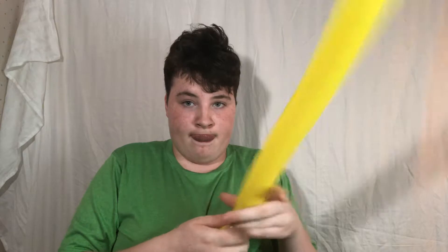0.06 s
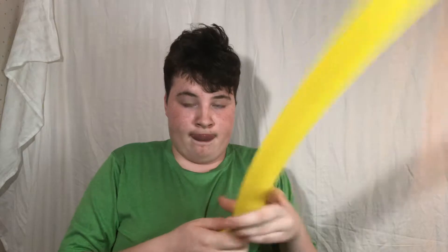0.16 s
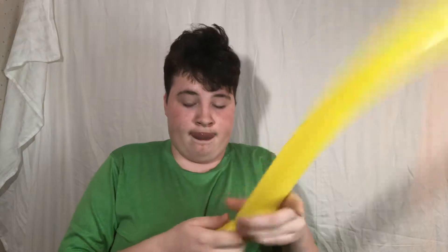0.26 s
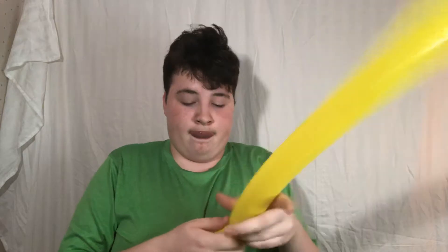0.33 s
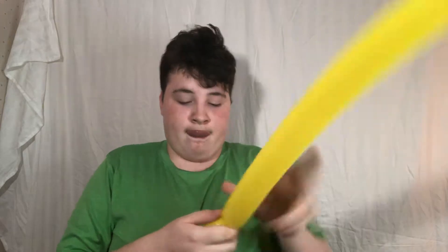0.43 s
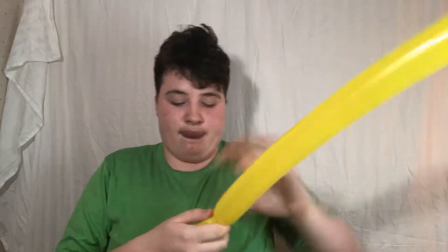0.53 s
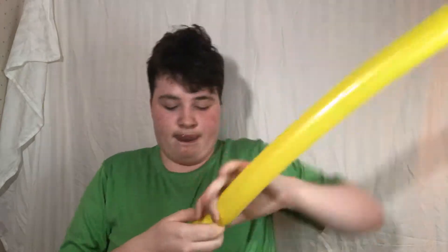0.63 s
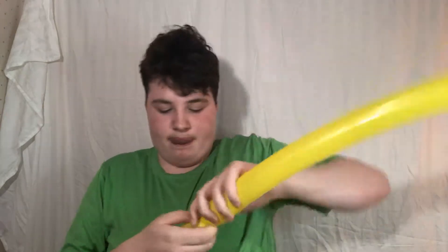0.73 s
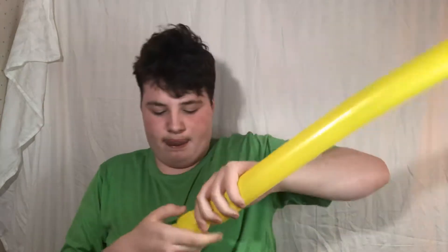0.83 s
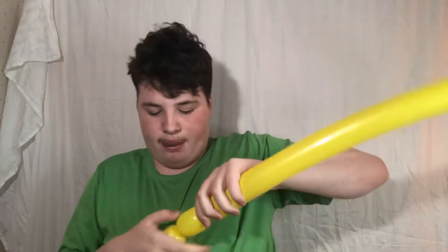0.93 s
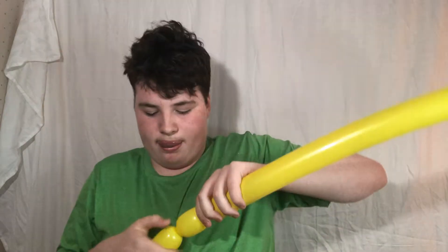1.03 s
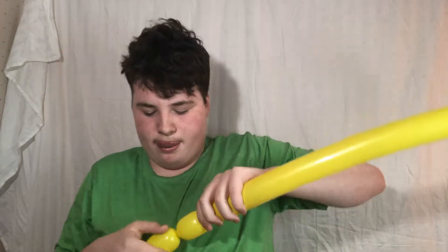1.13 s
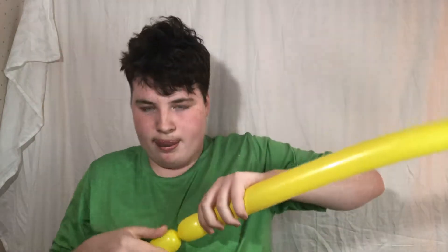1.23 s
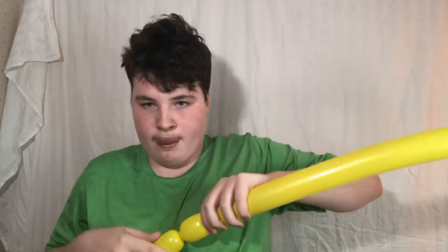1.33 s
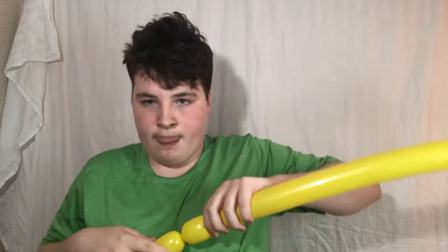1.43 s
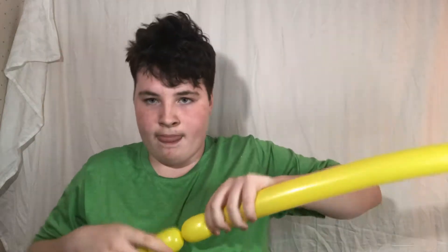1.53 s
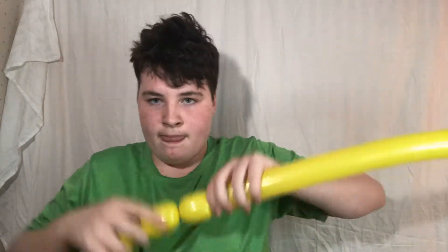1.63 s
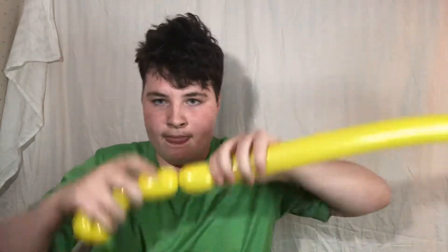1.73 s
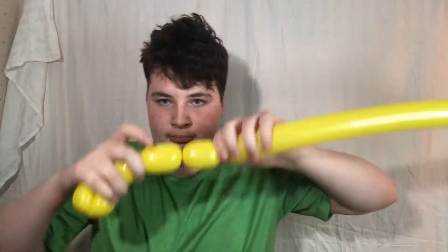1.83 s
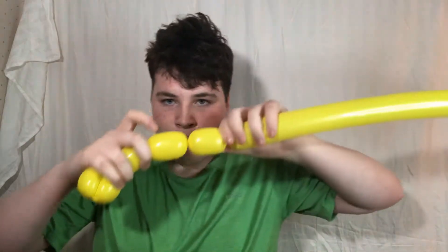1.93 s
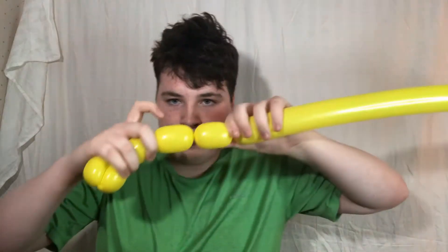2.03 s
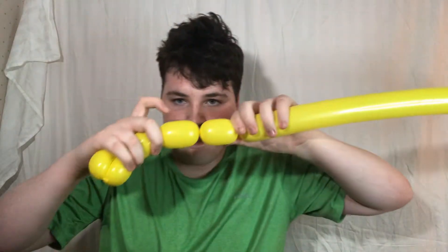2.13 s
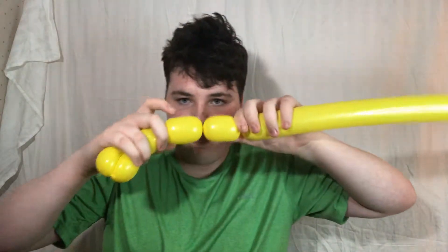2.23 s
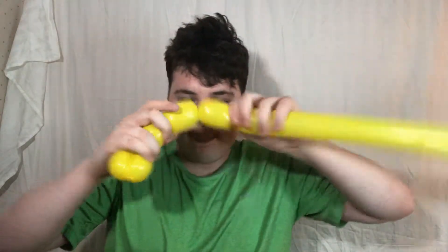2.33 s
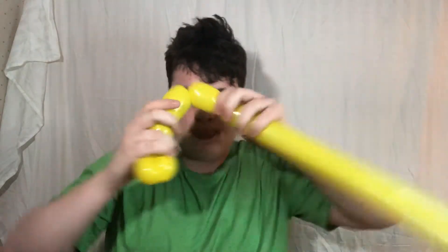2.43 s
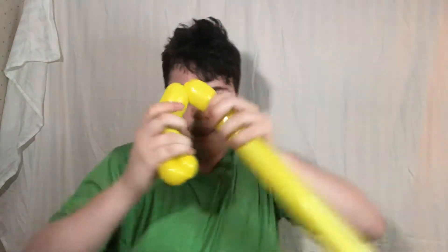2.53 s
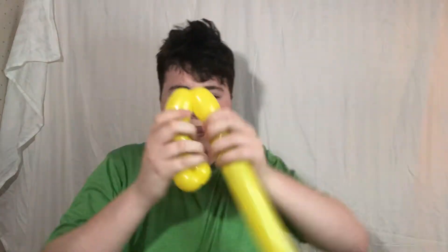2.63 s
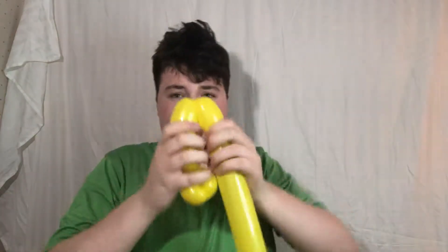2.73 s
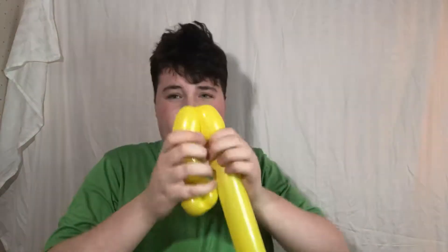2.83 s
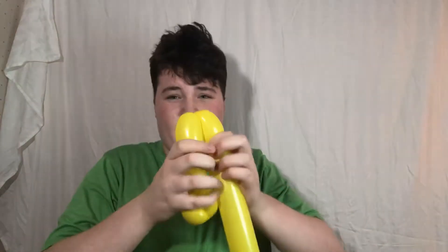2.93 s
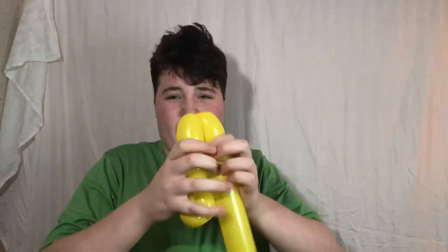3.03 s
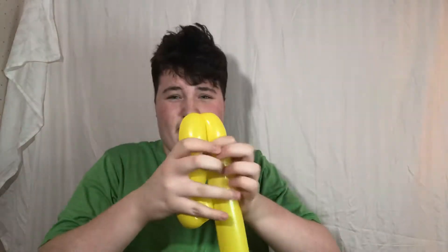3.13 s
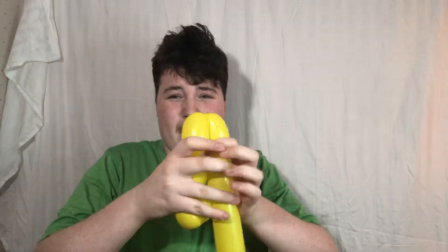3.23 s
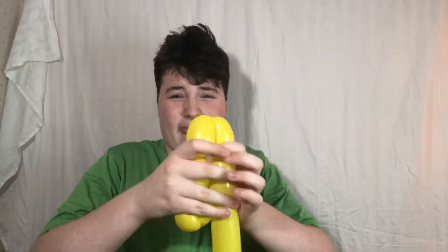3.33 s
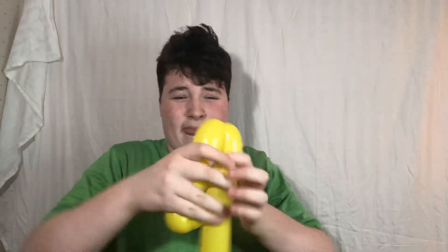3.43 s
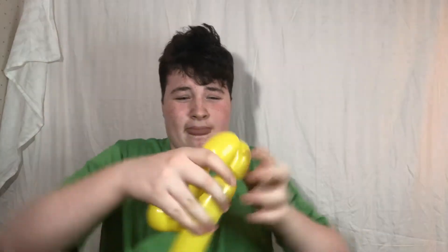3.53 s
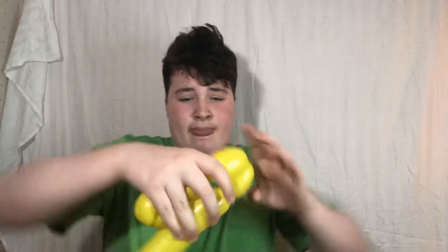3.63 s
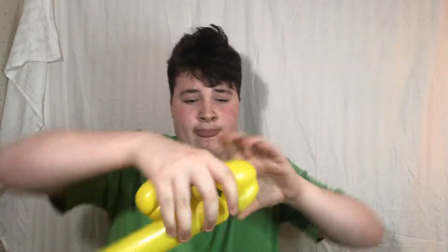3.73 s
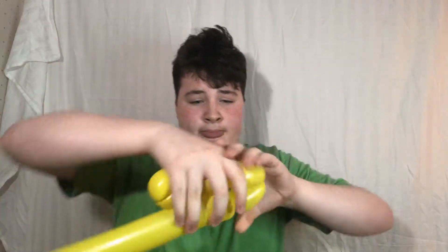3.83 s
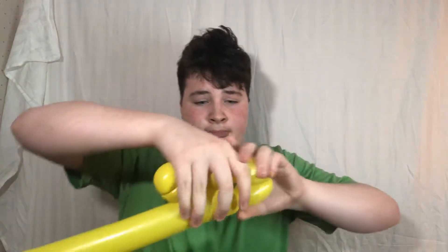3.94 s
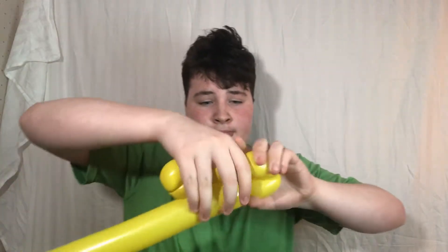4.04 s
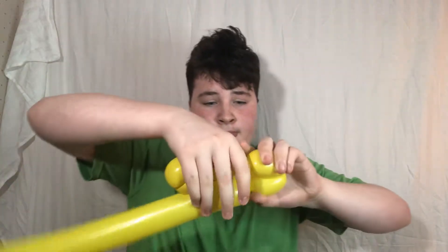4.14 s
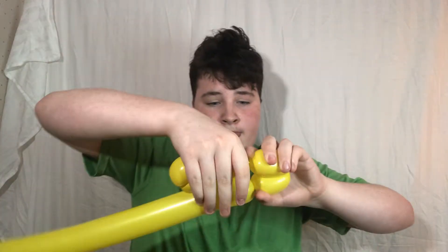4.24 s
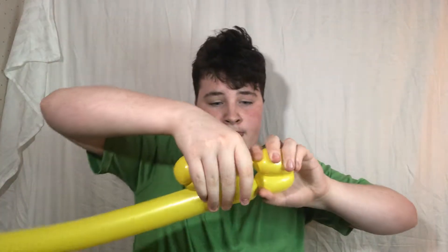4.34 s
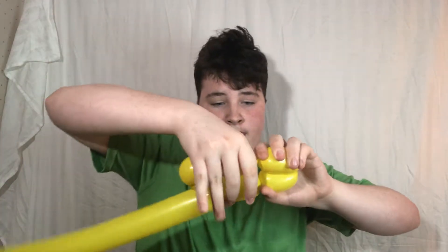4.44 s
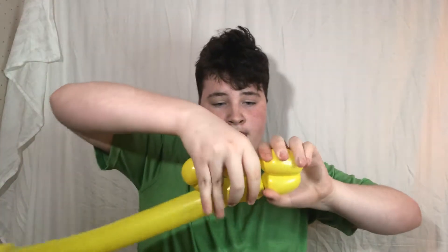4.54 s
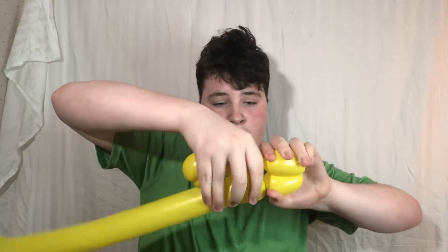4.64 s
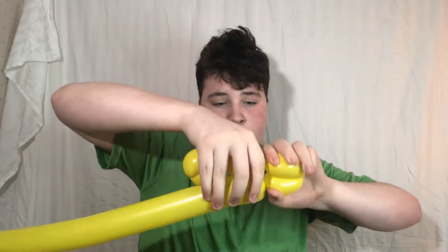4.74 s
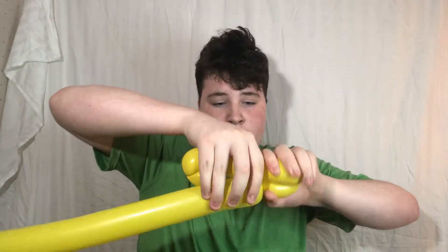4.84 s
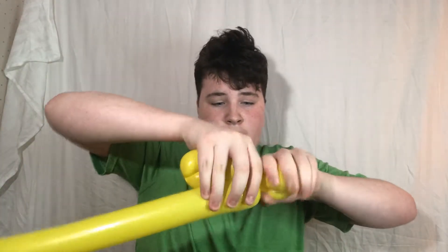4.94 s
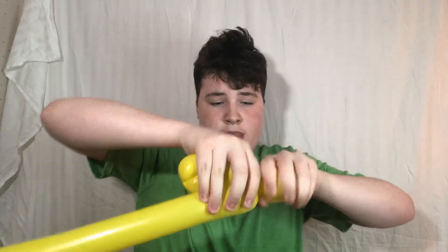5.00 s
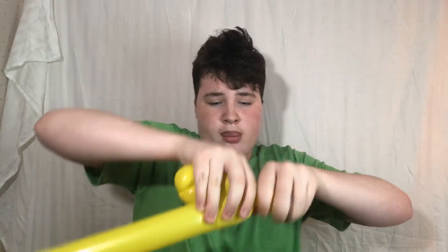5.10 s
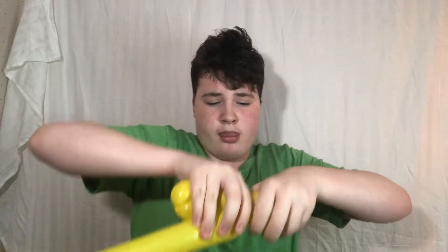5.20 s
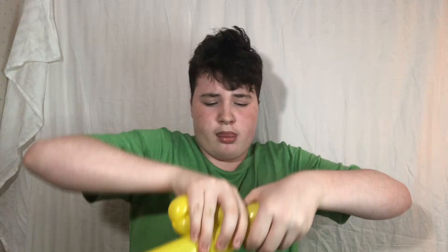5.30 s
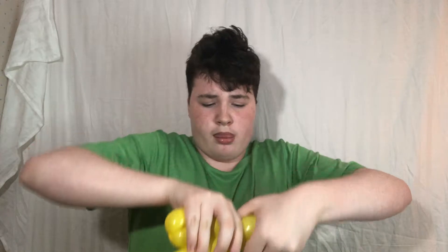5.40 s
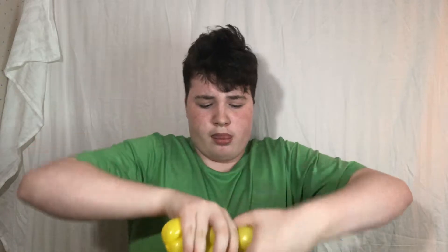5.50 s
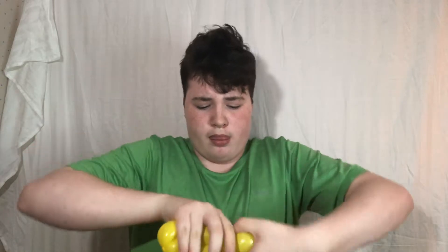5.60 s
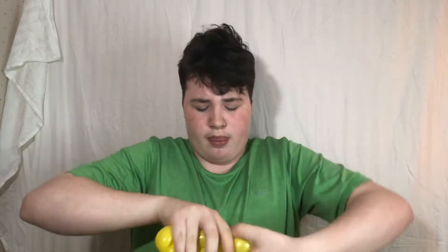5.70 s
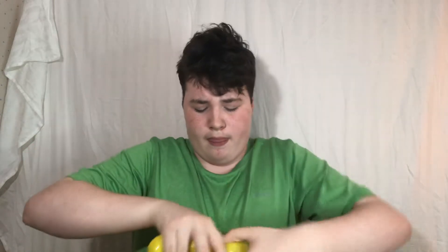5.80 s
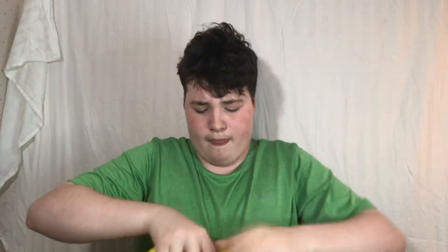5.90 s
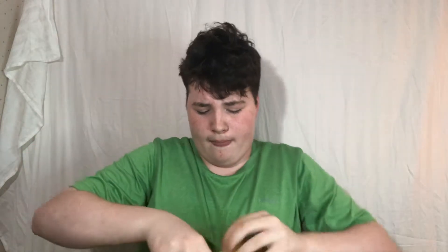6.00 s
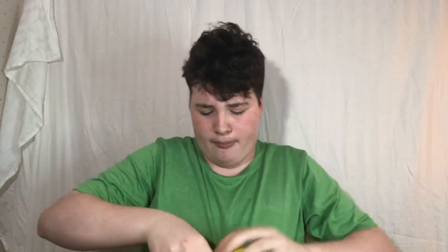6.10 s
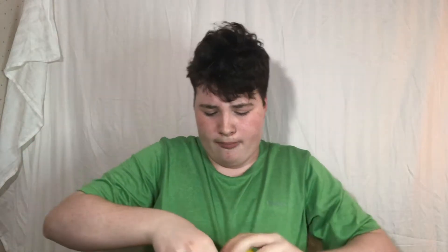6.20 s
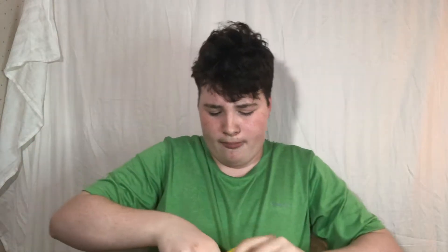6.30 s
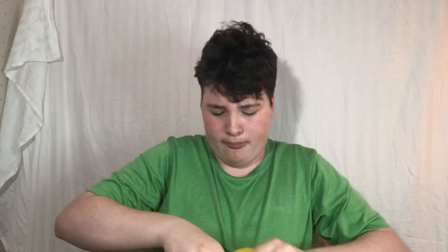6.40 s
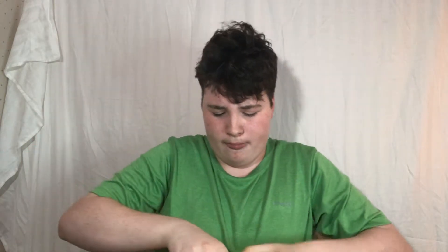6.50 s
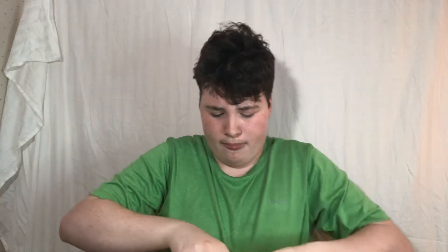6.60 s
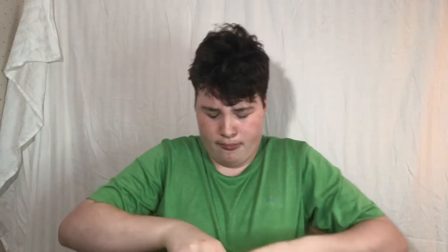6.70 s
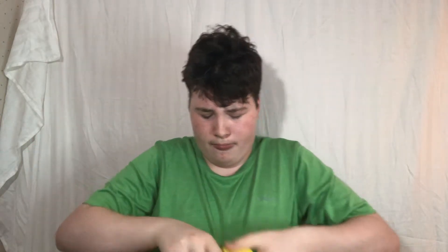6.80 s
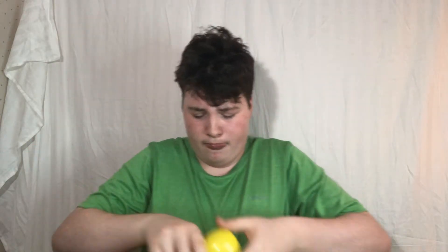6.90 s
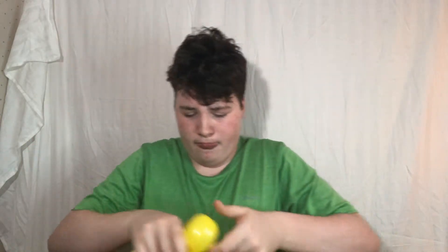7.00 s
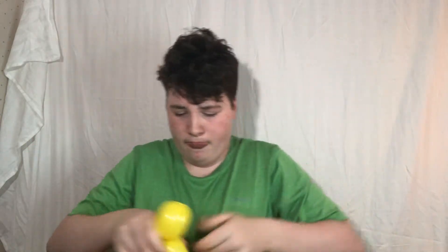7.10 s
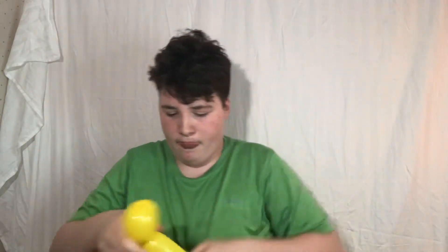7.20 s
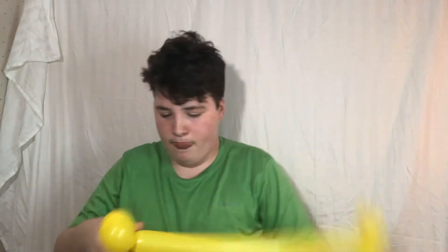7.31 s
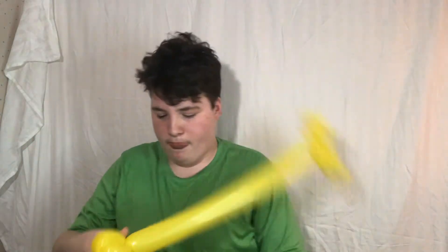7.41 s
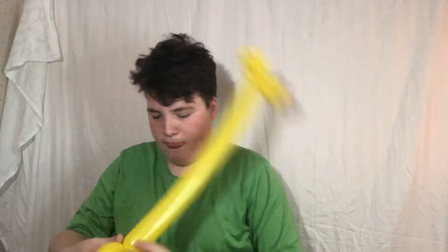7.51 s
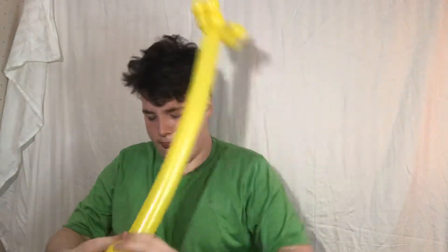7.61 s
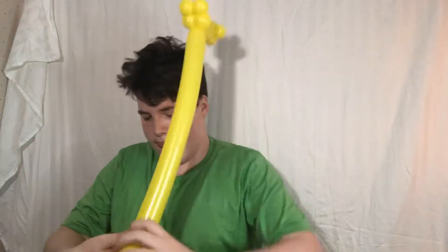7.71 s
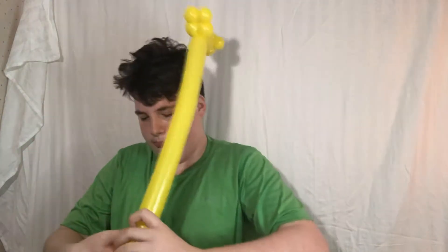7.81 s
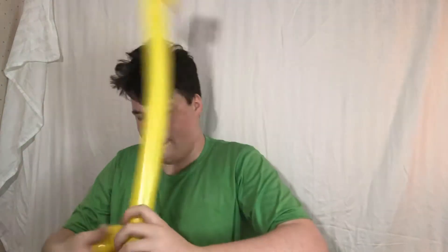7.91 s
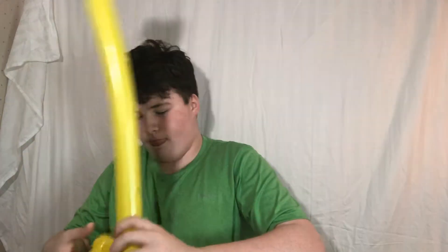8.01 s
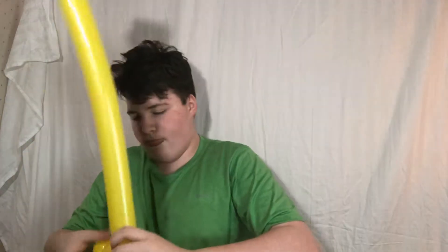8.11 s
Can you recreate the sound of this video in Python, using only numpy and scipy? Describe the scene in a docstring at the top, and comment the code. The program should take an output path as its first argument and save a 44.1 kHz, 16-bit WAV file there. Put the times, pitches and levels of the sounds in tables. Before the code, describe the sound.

Hands twist and rub a long latex balloon up close in a small room, giving squeaks, creaks, rasps and sharp snaps between quiet gaps.

```python
"""Long balloon twisted by hand.

Hands twist and brush a long latex balloon, stroke by stroke, in a small room. The rubber sticks and slips:
single slips snap, slow trains creak, fast uneven ones rasp and fast even ones squeak.
Every slip is a pulse run through the taut skin as a tiny falling chirp, repeated between two twists.
Jolts thud softly in low noise; the room adds a short tail of decaying noise and a faint steady rush."""
import sys
import numpy as np
from scipy import signal
from scipy.fft import rfft, irfft, next_fast_len
from scipy.io import wavfile
from scipy.ndimage import uniform_filter1d, map_coordinates

SR = 44100
rng = np.random.default_rng(int(sys.argv[2]) if len(sys.argv) > 2 else 0)


def pcm_store(signal):
    """Save signal as 16-bit PCM."""
    levels = np.round(np.clip(np.atleast_2d(signal), -1, 1) * 32767)
    wavfile.write(sys.argv[1], SR, levels.astype(np.int16).T)


N = 359415


def amp(db):
    """Decibels to gain."""
    return 10 ** (np.asarray(db) / 20)


def unit(x):
    """Scale to rms 1."""
    return x / np.sqrt(np.mean(x ** 2) + 1e-20)


def along(points, hz):
    """Interpolate (Hz, value) points on a log frequency axis."""
    point_hz, value = np.transpose(points)
    return np.interp(np.log(hz + 1), np.log(point_hz), value)


def at(rows, t):
    """Interpolate each column of a (seconds, values..) curve at the times t."""
    row_s, *columns = np.transpose(rows)
    return [np.interp(t, row_s, column) for column in columns]


def wobble(t, knots_per_s):
    """Smooth random curve at the times t."""
    knots = rng.standard_normal(int(N * knots_per_s / SR) + 4)
    return map_coordinates(knots, [t * knots_per_s], mode="nearest")


def filtered(x, response):
    """Multiply the spectrum of x by a function of frequency."""
    m = next_fast_len(N + SR // 2)
    return irfft(rfft(x, m) * response(np.fft.rfftfreq(m, 1 / SR)), m)[:N]


def causal(gain):
    """Minimum-phase response with this gain, by folding the cepstrum."""
    cepstrum = irfft(np.log(np.maximum(gain, 1e-6)))
    half = len(cepstrum) // 2
    folded = np.r_[cepstrum[0], 2 * cepstrum[1:half], np.zeros(half)]
    return np.exp(rfft(folded))


def pulses(times, sizes, half_width=8):
    """Band-limited impulses (windowed sincs) that may fall between samples."""
    index = np.floor(times * SR).astype(int)[:, None] + np.arange(1 - half_width, half_width + 1)
    lag = index - times[:, None] * SR
    shape = np.sinc(lag) * np.cos(np.pi * lag / (2 * half_width)) ** 2
    return np.bincount(np.clip(index, 0, N).ravel(), (sizes[:, None] * shape).ravel(), N + 1)[:N]


def stick_slip(t, rate_hz, rough, scatter_db):
    """Slip times and sizes (dB): roughness randomises how long each stick lasts and how large its slip is."""
    cycles = np.cumsum(rate_hz) / SR
    chance = rng.standard_normal((int(cycles[-1]) + 1, 2))
    order = np.arange(len(chance))
    spread = np.clip(np.interp(order, cycles, rough), 0, 1)
    drift = np.cumsum(spread * chance[:, 0])
    # the hand's travel keeps the slips from running ahead for long
    count = order + drift - uniform_filter1d(drift, size=15, mode="nearest")
    times = np.interp(count, cycles, t)
    # slower trains make larger slips
    spacing_db = 10 * np.log10(SR / np.interp(times, t, rate_hz))
    return times, spacing_db + scatter_db * spread * (chance[:, 1] - spread)


# Radiation of the skin. Each row: frequency in Hz, level in dB per Hz.
SKIN_HZ_DB = [(100, -66), (220, -18), (330, 0.5), (470, 5), (750, 2.5), (1000, 0), (1600, 1), (2500, -1),
              (3500, -1), (5000, -3), (7800, -6.5), (10000, -12.5), (13000, -14.5), (16000, -22.5)]
# Air pockets and taut patches. Each row: centre in Hz, width in Hz, boost in dB.
POCKETS_HZ_HZ_DB = [(1500, 23, 2.5), (3220, 170, 2.5), (5150, 220, 1)]
# Resonance of the pinched stretch of rubber. Each row: time in seconds, centre in Hz, lift in dB.
PINCH_S_HZ_DB = [(.05, 2105, 7.5), (.9, 798, -0.5), (1.07, 2320, 2.5), (1.3, 808, -1), (1.38, 764, 9),
                 (2.9, 2486, 0), (4.08, 910, 4), (4.33, 1061, 7.5), (4.8, 950, 7), (5.2, 1470, -1),
                 (5.65, 647, 5.5), (6.4, 880, 5), (6.88, 754, 2.5), (7.9, 640, 3.5)]


def balloon(times, db, bass_db, treble_db, echo, lap_s, sweep_s, top_db, patchy_db,
            top_follow=0.41, bands=14, laps=4):
    """Slips chirp through the skin; each wave shuttles between two twists, keeping the share echo per lap."""
    hz = np.fft.rfftfreq(4096, 1 / SR)
    pockets_db = sum(g / (1 + (2 * (hz - f) / w) ** 2) for f, w, g in POCKETS_HZ_HZ_DB)
    colour = amp(along(SKIN_HZ_DB, hz) + pockets_db)
    # low ripples travel more slowly: 1 kHz is late by sweep_s
    response = causal(colour) * np.exp(-4j * np.pi * sweep_s * np.sqrt(1000 * hz))

    def power_db(low_hz, high_hz):
        """Skin power over one range, to be taken off its tone setting."""
        return 10 * np.log10(np.mean(colour ** 2 * (hz > low_hz) * (hz < high_hz)))

    bass = bass_db - power_db(0, 850)
    middle = np.full_like(db, -power_db(850, 3000))
    treble = treble_db - power_db(3000, SR)
    tones = np.array([bass, middle, middle, treble, treble + top_follow * treble_db + top_db])
    anchors = np.log2([600, 1000, 2400, 4000, 12000])
    octaves = np.linspace(np.log2(300), np.log2(13000), bands)
    pinch_hz, lift_db = at(PINCH_S_HZ_DB, times)
    trips = np.arange(laps)[:, None]
    returns = np.clip(echo, 0, 1) ** trips
    out = np.zeros(N)
    for octave, pick in zip(octaves, np.eye(bands)):
        weights = np.array([np.interp(octave, anchors, e) for e in np.eye(len(anchors))])
        tone_db = weights @ tones
        pinch_db = lift_db * (np.exp(-((octave - np.log2(pinch_hz)) / .38) ** 2) - .35)
        # the contact point wanders, favouring now one part of the range, now another
        patch_db = patchy_db * wobble(times, 35)
        size = amp(db + tone_db + pinch_db + patch_db) / np.linalg.norm(returns)
        drive = pulses((times + trips * lap_s).ravel(), (size * returns).ravel(), half_width=4)
        band = np.interp(np.log2(hz + 1), octaves, pick)
        # 128 samples of lead keep what rings before the pulse
        ring = np.roll(irfft(response * band), 128)[:1500]
        out += signal.oaconvolve(drive, ring)[128:N + 128]
    return out


# Steady room noise. Each row: frequency in Hz, level in dB per Hz before scaling to rms 1.
RUSH_HZ_DB = [(22, -48), (45, -19), (105, -17.5), (195, -6), (335, -11.5), (600, -16), (2100, -26),
              (5400, -59), (14400, -57)]


def rush(level_db=-53):
    """The room's own faint, dull noise: white noise through a fixed curve."""
    noise = filtered(rng.standard_normal(N), lambda hz: amp(along(RUSH_HZ_DB, hz)))
    return amp(level_db) * unit(noise)


# Fingers shift their hold in a light, rough brush. Each row: start in seconds, length in seconds,
# crest level in dB.
BRUSHES_S_S_DB = [(0.001, .15, -38), (0.214, .09, -40.5), (0.331, .14, -47), (0.461, .21, -47),
                  (0.662, .05, -31.5), (0.94, .09, -58), (1.39, .2, -49), (1.682, .03, -43),
                  (1.72, .08, -58.5), (1.869, .14, -51.5), (2.071, .05, -51), (2.334, .08, -49.5),
                  (2.419, .11, -46), (2.549, .17, -41.5), (2.721, .16, -42), (3.385, .16, -47),
                  (3.722, .12, -57), (3.854, .09, -43.5), (4.191, .09, -52), (4.419, .16, -50),
                  (5.918, .03, -42.5), (6.039, .08, -50), (6.951, .14, -48), (7.302, .2, -49.5),
                  (7.499, 0.26, -47.5), (7.785, .08, -45), (8.082, .068, -50.5)]
# Shared by all brushes: share of the length spent rising; bass dB, treble dB, slips a second, roughness 0-1.
BRUSH_RISE, BRUSH_TONE = 0.3, (-2.5, 0, 150, 0.6249)
# A hand twists the rubber, pressing up to a crest and easing off. Each row: start in seconds, rise in seconds,
# fall in seconds, then at the crest level in dB, bass in dB, treble in dB, slips a second, roughness 0-1.
TWISTS = [(0.704, .03, .1, -26.5, -11, -2, 900, .15), (0.875, .02, .07, -34, -4.5, -3, 190, .5),
          (0.949, .04, .06, -51, 10, 7.5, 110, .2), (1.048, .012, .08, -30, -3, -6.5, 126, .2),
          (1.1, .04, .11, -38.5, 6, -2.5, 125, .2), (1.23, .06, .03, -26.5, 1.5, -1, 200, .07),
          (1.295, .033, .027, -19, -9, -0.5, 400, .12), (1.33, .027, .028, -20.5, -1.5, 0, 740, .08),
          (2.99, .05, .2, -36, -9, 1, 700, .4), (3.17, .1, .08, -42.5, -8, 4, 750, .45),
          (3.34, .07, .1, -46.5, 9.5, -8, 200, .5), (3.925, .058, .05, -34.5, -8.5, -1, 300, .43),
          (4.07, .025, .11, -42, -12, -1, 310, 0.5), (4.275, .062, .055, -28, -13, -3.5, 300, .37),
          (4.57, .22, .08, -37, -1, -3, 125, .07), (4.84, .17, .09, -33, -10, -1.5, 240, .35),
          (5.04, .07, .07, -28.5, -16, -9, 420, .08), (5.13, .075, .135, -27.5, -14, -2.5, 520, .18),
          (5.355, .012, .07, -25.5, -7, 3.5, 1000, .19), (5.44, .055, .05, -25.5, -0.5, 4, 1500, .12),
          (5.521, .135, .05, -27.5, -2, -2.5, 230, .3), (5.7, .02, .025, -27, 2, -3, 160, .25),
          (5.738, .022, .026, -24, 5.5, -4, 315, .1), (6.11, .03, .06, -38.5, -19, -1.5, 380, .4),
          (6.21, .055, .04, -35.5, -7, 1, 440, .45), (6.29, .08, .18, -32, -6.5, 3, 240, .3),
          (6.5, .1, .06, -36.5, 0.5, 1.5, 600, .2), (6.775, .045, .05, -28.5, -6, 0, 260, .23),
          (6.84, .04, .06, -30, -0.5, -2.5, 350, .17)]
# Away from its crest a stroke is quieter, slower and rougher, at most by these.
EASE_DB, EASE_OCTAVES, EASE_ROUGH_SHARE = 11, 0.55, 0.316


def strokes():
    """Each hand movement as (times, level dB, bass dB, treble dB, slips a second, roughness), led by its effort."""
    brushes = [(start_s, BRUSH_RISE * length_s, (1 - BRUSH_RISE) * length_s, db, *BRUSH_TONE)
               for start_s, length_s, db in BRUSHES_S_S_DB]
    for start_s, rise_s, fall_s, db, bass_db, treble_db, rate_hz, rough in TWISTS + brushes:
        age = np.arange(int((rise_s + fall_s) * SR)) / SR
        effort = np.sin(np.pi / 2 * np.interp(age, [0, rise_s, rise_s + fall_s], [0, 1, 0]))
        ease = 1 - effort
        eased_hz = rate_hz * 2 ** (-EASE_OCTAVES * ease)
        eased_rough = rough * (1 + EASE_ROUGH_SHARE * ease)
        yield start_s + age, db - EASE_DB * ease, bass_db, treble_db, eased_hz, eased_rough


def rubbing(level_db=-1, grit_db=-5, grit_hz=500, spiky_db=5.0):
    """One main contact sticks and slips; the other fingers add grit and ticks when it runs rough."""
    slips = []
    for t, press_db, bass_db, treble_db, rate_hz, rough in strokes():
        uneven_hz = rate_hz * np.exp(.25 * rough * wobble(t, 60))
        main, main_db = stick_slip(t, uneven_hz, rough, scatter_db=7.0)
        grit = rng.uniform(t[0], t[-1], int(grit_hz * len(t) / SR))
        # most side slips are tiny, a few stand out as ticks
        tick_db = spiky_db * np.minimum(rng.exponential(size=len(grit)), 4)
        fine_db = grit_db + tick_db + 10 * np.log10(SR / grit_hz * np.interp(grit, t, rough) ** 2)
        times = np.r_[main, grit]
        db = level_db + np.r_[main_db, fine_db] + np.interp(times, t, press_db)
        slips.append(np.broadcast_arrays(times, db, bass_db, treble_db, np.interp(times, t, rough)))
    times, db, bass_db, treble_db, rough = np.hstack(slips)
    # rough rubbing slips at scattered spots, so the way to the twist differs from slip to slip
    scatter = 1.4 * rough * rng.standard_normal(len(times))
    lap_s = .0008 * np.exp(0.248 * wobble(times, 30) + scatter)
    return balloon(times, db, bass_db, treble_db, echo=0.76, lap_s=lap_s, sweep_s=0.001758,
                   top_db=1, patchy_db=3.5)


# A finger skids. Each row: start in seconds, length in seconds, first pitch in Hz, last pitch in Hz,
# roughness 0-1, level in dB, bass in dB, treble in dB.
SKIDS = [(0.025, 0.021, 1482, 1383, 0.09, -28.5, -28, 4), (0.053, 0.022, 1583, 1430, 0.13, -30.5, -10, 3.5),
         (0.174, 0.02, 301.3, 169, 0.2, -29, -7.5, 1), (0.262, 0.0168, 798, 696, 0.31, -24, -35, -1.5),
         (0.342, 0.024, 485, 479, 0.07, -29.5, -4.5, -2.5), (0.37, 0.015, 883, 826, 0.04, -32, 16.5, 0.5),
         (0.798, 0.013, 855, 1110, 0.11, -23.5, 4.5, -16), (1.684, 0.011, 636, 592, 0.29, -36.5, 4, -2),
         (2.617, 0.012, 516.3, 447, 0.24, -45.5, 18, -17.5),
         (2.724, 0.012, 3706, 2270, 0.11, -26.5, -26, -10.5),
         (2.87, 0.017, 1414, 1776, 0.14, -25, -12, -8.5), (2.882, 0.014, 3440, 3220, 0.07, -26.5, 3, 5.5),
         (2.9, 0.054, 1847, 2264, 0.13, -26.5, -0.5, 0.5), (3.016, 0.0053, 597, 533, 0.01, -31, 4.5, -7),
         (3.507, 0.028, 443, 515, 0.05, -36, 7, -12), (4.389, 0.011, 488, 399.8, 0.24, -39, 8.5, 0.5),
         (5.343, 0.009, 3586, 3630, 0.1, -32.5, 7.5, 13.5), (5.953, 0.042, 380, 486, 0.03, -30, 3.5, -0.5),
         (6.583, 0.029, 703, 796.3, 0.34, -30, -8.5, 2.5), (6.725, 0.011, 601, 500, 0.13, -30.5, -11, 1.5),
         (7.497, 0.0091, 398, 349, 0.2, -28, 1.5, -1.5), (7.521, 0.012, 506.4, 459, 0.22, -28.5, -6, -1),
         (7.59, 0.014, 300, 247, 0.43, -31, -3.5, -2.5), (7.871, 0.05, 649, 589.6, 0.2, -26.5, -3.5, -8.5)]


def skids(edge_db=6):
    """Short squeaks: stick-slip trains that swell, glide and stop."""
    slips = []
    for start_s, length_s, first_hz, last_hz, rough, db, bass_db, treble_db in SKIDS:
        t = start_s + np.arange(int(length_s * SR)) / SR
        glide_hz = np.linspace(first_hz, last_hz, len(t))
        times, size_db = stick_slip(t, glide_hz, np.full(len(t), rough), scatter_db=9)
        # 2 / pi centres the swell on 0 dB
        swell_db = edge_db * (np.sin(np.pi * (times - start_s) / length_s) - 2 / np.pi)
        slips.append(np.broadcast_arrays(times, db + size_db + swell_db, bass_db, treble_db))
    times, db, bass_db, treble_db = np.hstack(slips)
    lap_s = 0.000477 * np.exp(0.45 * wobble(times, 9))
    return balloon(times, db, bass_db, treble_db, echo=0.5, lap_s=lap_s, sweep_s=0.001426,
                   top_db=0.5, patchy_db=-2.5)


# The rubber lets go all at once. Each row: time in seconds, level in dB before the common gain,
# bass in dB, treble in dB.
SNAPS = [(0.2293, -53, 20, 18), (0.521, -42.5, 5, 13.5), (0.5585, -43, 9, 12), (0.6694, -38.5, 9, 9),
         (0.6771, -32.5, 4, 11.5), (0.8154, -22, -10, 4), (0.8979, -21.5, 2, -4),
         (0.9075, -30.5, -9.5, 2.5), (0.9173, -38, -26, 1), (1.046, -14, -21, -3.5), (1.0671, -24, -7, -6),
         (1.2462, -36, 13.5, -1.5), (1.8799, -35, -30, 0.5), (1.9215, -28.5, -35, -4),
         (2.366, -38, -12, -4), (2.4621, -28, -28, -2), (2.651, -30.5, -26, 3), (2.7559, -25.5, -8, -1),
         (3.1522, -36.5, -5, 5.5), (3.3927, -33, -4, 2.5), (3.7858, -47.5, 2, 18.5),
         (3.9738, -32, -19, 9.5), (4.0817, -20.5, 1.5, -7.5), (4.0878, -34.5, -26, 10.5),
         (4.2877, -19.5, -19, -5.5), (4.302, -24, 1.5, 1.5), (4.3252, -21, -22, -8),
         (4.872, -23, -14, 10.5), (4.893, -34, -29, 13), (4.906, -23.5, -19, 9), (4.9291, -25.5, -23, 12),
         (4.9461, -25, -31, 12.5), (4.9612, -23.5, -29, 11.5), (4.9852, -23, -19, 9),
         (5.0309, -25, -19, 10), (5.0803, -27.5, -27, 14.5), (5.1569, -27, -6.5, 9),
         (6.6405, -27.5, -40, 3.5), (6.6945, -30, 0, 5.5), (6.7598, -31.5, -1, 8.5),
         (6.9275, -34.5, 10, 7.5), (7.0184, -37.5, 6.5, 5), (7.1803, -33.5, -0.5, 1.5)]


def snaps(gain_db=22):
    """Single large slips, each with its own way back from the twist."""
    times, db, bass_db, treble_db = np.transpose(SNAPS)
    lap_s = 0.00101 * np.exp(0.337 * rng.standard_normal(len(times)))
    # slips go 0.7 ms ahead of the listed times
    return balloon(times - .0007, gain_db + db, bass_db, treble_db, echo=0.61, lap_s=lap_s,
                   sweep_s=0.002236, top_db=-3, patchy_db=3.5)


# The whole balloon is jolted in the hands. Each row: time in seconds, level in dB.
BUMPS_S_DB = [(0.821, -43), (7.504, -40.5), (7.595, -54), (7.921, -46)]


def bumps(t60_s=0.41, rise_s=0.0011, centre_hz=210):
    """A jolt sets the whole tube flapping: a soft, low thud of decaying noise."""
    start_s, level_db = np.transpose(BUMPS_S_DB)[:, :, None]
    age = np.maximum(np.arange(N) / SR - start_s, 0)
    thuds = amp(level_db - 60 * age / t60_s) * (1 - np.exp(-age / rise_s))
    low_band = lambda hz: (hz / centre_hz) ** 2 / (1 + (hz / centre_hz) ** 5)
    return thuds.sum(axis=0) * unit(filtered(rng.standard_normal(N), low_band))


# Room decay. Each row: frequency in Hz, t60 in seconds.
WALLS_HZ_S = [(250, 0.5), (1000, 0.43), (4000, 0.33), (14000, 0.24)]


def room(x, early_db=1, early_t60_s=0.0047, delay_s=.004, places=12):
    """Near walls answer first, then a diffuse tail; the pattern changes as the balloon moves."""
    out = np.zeros(N)
    place = np.linspace(0, places - 1, N)
    for k in range(places):
        hz, t, grid = signal.stft(rng.standard_normal(SR // 2), SR, nperseg=256)
        late = amp(-60 * t / along(WALLS_HZ_S, hz)[:, None])
        early = amp(early_db - 60 * t / early_t60_s)
        tail = signal.istft(grid * (late + early), SR, nperseg=256)[1]
        tail = np.pad(tail / np.linalg.norm(tail), (int(delay_s * SR), 0))
        # equal-power crossfade from place to place
        share = np.sqrt(np.clip(1 - abs(place - k), 0, 1))
        out += signal.oaconvolve(x * share, tail)[:N]
    return out


def scene(wet_db=-8):
    """The balloon close by, in its room."""
    latex = rubbing() + skids() + snaps() + bumps()
    return (latex + amp(wet_db) * room(latex) + rush())[None]


def record(dry, top_hz=16100):
    """Peaks near full scale are rounded; a steep low-pass removes what lies above top_hz."""
    rounded = dry[0] / (1 + np.abs(dry[0]) ** 6) ** (1 / 6)
    return filtered(rounded, lambda hz: 1 / (1 + (hz / top_hz) ** 120))[None]


dry = scene()
out = record(dry)
pcm_store(out)
```